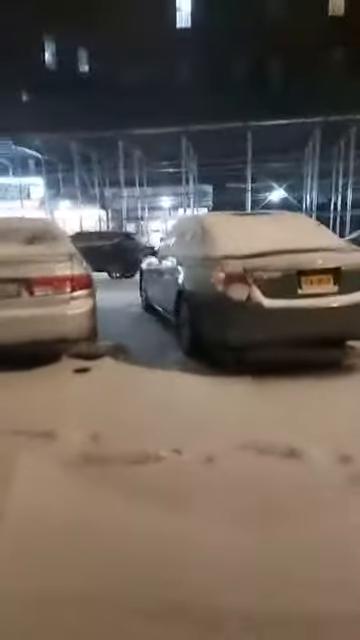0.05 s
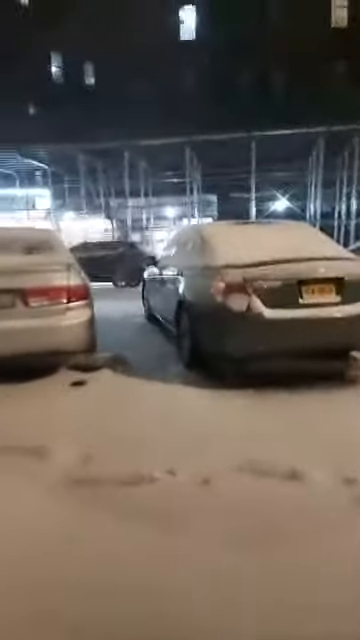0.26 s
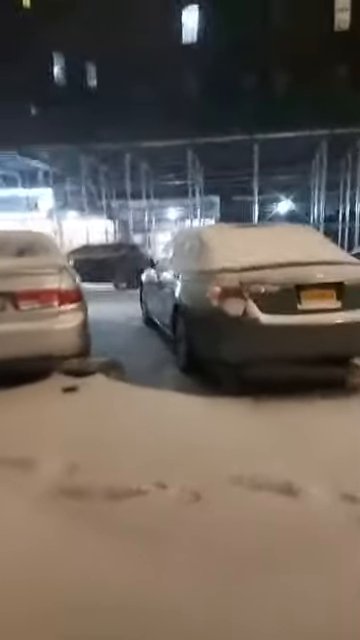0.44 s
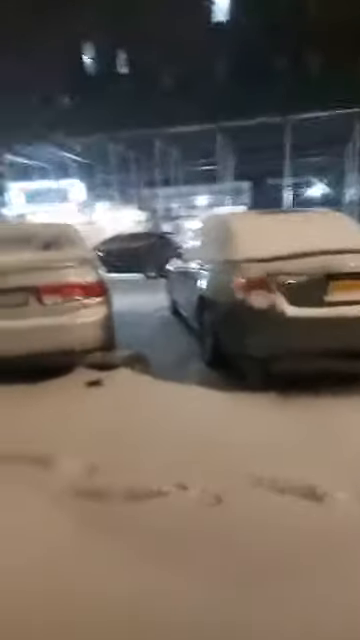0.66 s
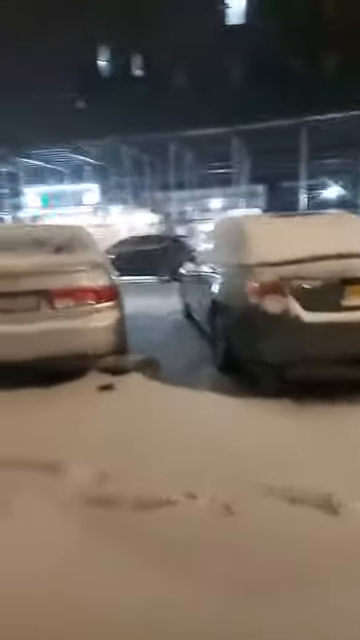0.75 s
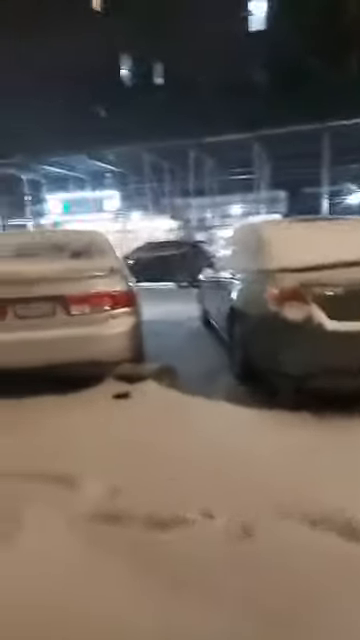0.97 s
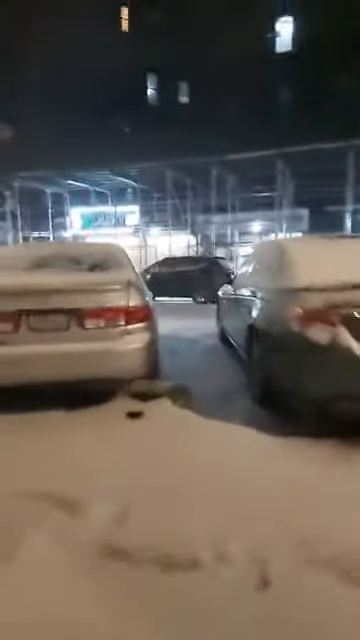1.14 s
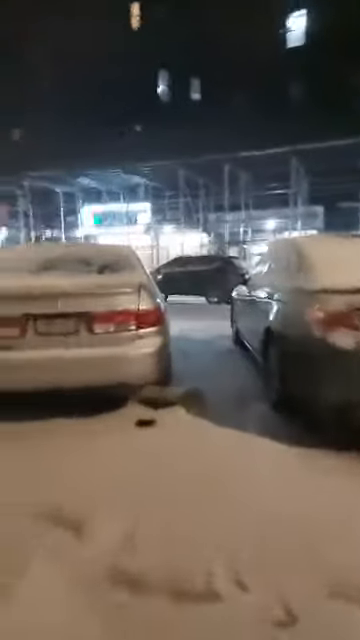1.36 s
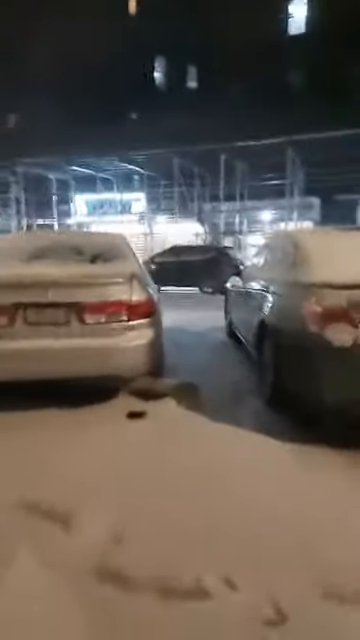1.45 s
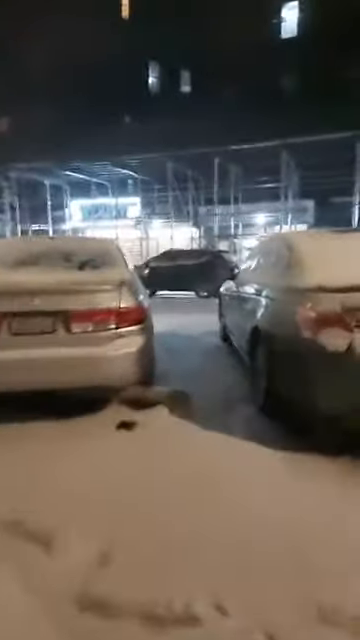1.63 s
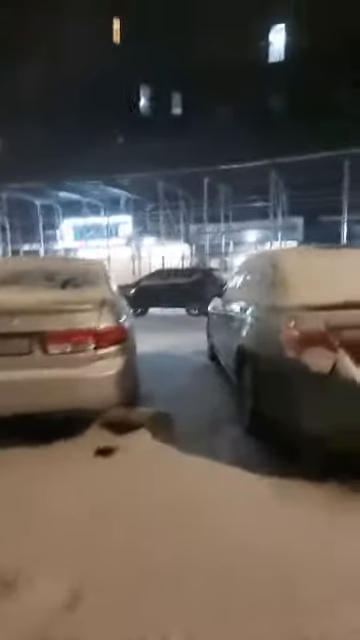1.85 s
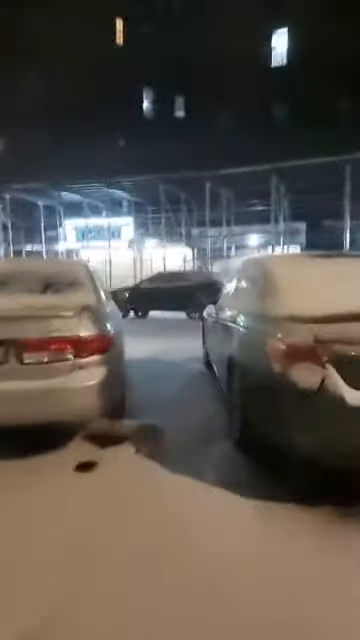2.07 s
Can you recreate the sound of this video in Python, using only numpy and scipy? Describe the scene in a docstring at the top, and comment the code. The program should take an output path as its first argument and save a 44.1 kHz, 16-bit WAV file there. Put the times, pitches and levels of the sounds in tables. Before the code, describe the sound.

Wind rumbles directly on a phone microphone from the start, low and uneven, with a thump near 0.4 seconds. It sinks to a lull around 0.6-0.75, exposing faint swishes and a thin squeak, then surges from 0.8, slapping hard near 1.1, 1.4, 1.55 and 1.8. Tiny icy ticks scatter throughout; a small snow crunch comes near 1.74. After 1.9 it drops away over faint town hum.

```python
"""Gusty wind buffets the microphone of a phone carried through a snowy parking lot at night.
The wind is banded noise: big eddies rumble with the gusts, small ones add a ragged flutter.
Single eddies slap the port as push-pull pulses.
Underneath: a faint town hum of shaped noise, swelling swishes of snow and clothing with thin squeaks,
and short resonant bursts for icy flakes ticking on the phone and crunches of packed snow."""
import sys
import numpy as np
from scipy import signal
from scipy.fft import rfft, irfft
from scipy.io import wavfile
from scipy.ndimage import uniform_filter1d

SR = 44100
rng = np.random.default_rng(int(sys.argv[2]) if len(sys.argv) > 2 else 0)


def digitize_waveform(pressure):
    """Quantize a signal to 16-bit integers and store it at the path in sys.argv[1].

    Rows of a 2-D input are taken as channels; values are limited to [-1, 1].
    """
    field = np.atleast_2d(pressure).T
    bounded = np.clip(field, -1, 1)
    quanta = np.round(bounded * 32767).astype(np.int16)
    wavfile.write(sys.argv[1], SR, quanta)


N = 92565

# Distant town, relative spectrum: frequency_hz, density_db (per Hz)
TOWN_COLOUR = [(40,7),(120,-4.5),(300,-11),(550,-15),(950,-6),(1500,-14.5),(2200,-21),(3200,-29.5),(5000,-32.5),(8000,-38),(15000,-47.5)]
# Soft swishes of snow and clothing: peak_s, rise_s, fall_s, level_db, tilt_db_per_octave
SWISHES = [(.25,0.1,0.075,-62.5,0.5),(.415,0.1,0.078,-56.5,0.5),(.56,0.047,0.038,-61.5,3.5),(.61,.04,0.053,-56,-2),(0.779,0.082,0.057,-72.5,3),(1.01,0.11,0.12,-60.5,-2.5),(1.189,0.094,.11,-59.5,-1),(1.411,0.13,0.16,-68.5,2.5),(1.65,0.097,0.045,-68,2),(1.83,0.14,0.12,-57.5,1),(1.95,0.1,0.14,-57.5,0.5),(2.09,0.023,.1,-55.5,1)]
# Relative spectrum of the swishes before their tilt: frequency_hz, density_db (per Hz)
SWISH_COLOUR = [(500,-10),(1500,9),(2600,-1),(4300,-1.5),(7000,-5.5),(9000,-10.5),(12000,-9.5),(15500,-9.5)]
# Thin squeaks of snow: peak_s, rise_s, fall_s, level_db
SQUEAKS = [(.615,0.053,.06,-68.5),(.79,.03,.04,-75.5)]
# Icy flakes on the phone: peak_s, level_db (energy spread over 5 ms), centre_hz
FLAKE_TICKS = [(.0995,-61.5,3810),(.150,-64,5000),(.233,-58.5,4200),(.289,-61.5,3600),(.570,-57,4770),(.992,-61.5,5500),(1.089,-63.5,5500),(1.1655,-54,4700),(1.436,-59.5,5240),(1.5072,-56,4200),(1.5578,-50.5,3900),(1.715,-60,4740)]
# Crunches of packed snow: peak_s, level_db (energy spread over 5 ms), centre_hz
SNOW_CRUNCHES = [(1.739,-42.5,1270),(1.783,-61.5,2700),(1.911,-55,1550)]
# Single eddies that slap the port: centre_s, peak_db (before BUFFET_TRIM_DB), pitch_hz
BUFFETS = [(.027,-18,407),(.061,-18,370),(.304,-23,420),(.380,-10.5,380),(0.4,-16,620),(.449,-21.5,420),(.839,-23,362),(1.007,-19.5,323),(1.102,-7.5,280),(1.125,-14,540),(1.286,-14,490),(1.346,-26,400),(1.425,-10,272),(1.478,-17,355),(1.544,-20,477),(1.563,-10.5,440),(1.659,-28.5,422),(1.677,-21.5,650),(1.815,-6,200)]
# Deep rumble of wind pressure at the port: time_s, level_db
RUMBLE_LEVEL = [(0.0, -22.5), (0.17, -22), (0.24, -24.1), (0.28, -15.5), (0.35, -24.5), (0.39, -17.5),
                (0.53, -25.5), (0.57, -31), (0.66, -34.5), (0.71, -42.2), (0.78, -34.5), (0.8, -25.5),
                (0.89, -21.5), (0.94, -26), (1.01, -19), (1.26, -19), (1.4, -21), (1.43, -19),
                (1.53, -20.5), (1.57, -16), (1.63, -27), (1.67, -15.5), (1.74, -31.5), (1.77, -14.5),
                (1.91, -27), (1.96, -42), (2.02, -29.4), (2.1, -29)]
# Low middle of the wind: time_s, level_db (before BODY_TRIM_DB)
BODY_LEVEL = [(0.0, -17), (0.07, -23), (0.09, -36), (0.18, -21), (0.22, -44), (0.25, -26.9), (0.38, -22),
              (0.44, -25.5), (0.5, -29.0), (0.63, -60), (0.74, -54.5), (0.84, -23), (0.89, -22),
              (0.94, -31), (1.11, -20.5), (1.2, -22), (1.24, -20.5), (1.34, -27.5), (1.36, -19),
              (1.4, -34.4), (1.47, -18), (1.51, -24.5), (1.57, -17.5), (1.6, -38), (1.68, -21.5),
              (1.71, -43), (1.81, -21), (1.98, -53), (2.02, -36), (2.1, -37.5)]
# Flutter from the small eddies of the hard gusts: time_s, level_db
FLUTTER_LEVEL = [(0.0, -42), (0.03, -34.5), (0.07, -30.5), (0.09, -41), (0.15, -43), (0.17, -38.7),
                 (0.22, -57.5), (0.31, -36.5), (0.34, -39), (0.38, -28.7), (0.56, -53), (0.77, -57),
                 (0.82, -45.5), (0.84, -38), (0.89, -36), (0.91, -44.5), (1.01, -35), (1.08, -41),
                 (1.1, -28.6), (1.14, -27.5), (1.2, -34.5), (1.29, -32), (1.3, -37), (1.36, -33.5),
                 (1.4, -63), (1.42, -32.5), (1.46, -42.5), (1.47, -39), (1.5, -41.4), (1.58, -26.5),
                 (1.6, -63), (1.68, -34), (1.76, -50), (1.81, -37), (1.83, -38.5), (1.96, -58),
                 (2.05, -43.5), (2.1, -46.5)]
# Relative spectrum of the wind before the gusts shape it: frequency_hz, density_db (per Hz)
WIND_COLOUR = [(15,-49),(25,-23.5),(38,-10),(52,-4.5),(72,0.5),(100,-1),(130,0),(165,-3),(210,-7.5),(310,-5.5),(420,-12.5),(600,-21),(800,-27),(1100,-36.5),(1600,-49),(2500,-62.5),(5000,-88)]
# Microphone response: frequency_hz, gain_db
MIC_RESPONSE = [(7500,0.5),(9000,-0.5),(10000,-7.5),(11500,1),(15000,2)]

TOWN_DB, TOWN_WAVER_DB = -49, -0.43
SWISH_GRAIN_DB, SWISH_GRAINS_PER_S = 2.5, 480
SQUEAK_HZ, SQUEAK_WIDTH_OCT = 4140, 0.04
SNAP_LEVEL_S = 0.005  # span over which the level of a tick or crunch is counted
BUFFET_TRIM_DB, BODY_TRIM_DB = -5, 1
BIG_EDDY_HZ, MIDDLE_EDDY_HZ, SMALL_EDDY_HZ = 130, 260, 545
RAGGED_PER_S, RAGGED_BIG_DB, RAGGED_SMALL_DB = 95, 1.5, 3
TOP_SWING = 0.27  # extra dB swing per dB of flutter, per octave above the small eddies
LOW_CUT_HZ, TOP_HZ, FADE_S = 27, 15750, 0.004


def undb(db):
    """Decibels to gain."""
    return 10 ** (np.asarray(db) / 20)


def unit(x):
    """Scale to rms 1."""
    return x / np.sqrt(np.mean(x ** 2))


def times():
    """Time of every sample in seconds."""
    return np.arange(N) / SR


def freqs():
    """Frequency of every spectral bin in Hz, kept at 1 or above so logarithms work."""
    return np.maximum(np.arange(N // 2 + 1) * SR / N, 1)


def curve(rows):
    """Join (time, value) rows by straight lines."""
    return np.interp(times(), *np.array(rows).T)


def colour(points):
    """Gain per bin from (Hz, dB) points, joined along log frequency."""
    hz, db = np.array(points).T
    return undb(np.interp(np.log(freqs()), np.log(hz), db))


def bell(hz, octaves):
    """Gain per bin of one smooth resonance."""
    distance = np.log2(freqs() / hz) / octaves
    return np.exp(-0.5 * distance ** 2)


def noise(gain):
    """Noise of rms 1 with the given gain per bin."""
    spectrum = rfft(rng.standard_normal(N)) * gain
    return unit(irfft(spectrum, N))


def walk(rate):
    """Smooth random wander of spread 1 that changes about rate times a second."""
    return noise(np.exp(-2 * (freqs() / rate) ** 2))


def swells(rows):
    """Envelope of soft swells, each with its own rise and fall; overlaps add in power."""
    t = times()
    power = 0
    for peak_s, rise_s, fall_s, level_db in rows:
        distance = (t - peak_s) / np.where(t < peak_s, rise_s, fall_s)
        power = power + (undb(level_db) * np.exp(-distance ** 2)) ** 2
    return np.sqrt(power)


def steady(x, size):
    """Even out the slow random swings of a noise, leaving its level to the gusts."""
    power = uniform_filter1d(x ** 2, size, mode="wrap")
    power = uniform_filter1d(power, size, mode="wrap")
    return x * np.sqrt(np.mean(x ** 2) / (power + 1e-20))


def town():
    """Distant streets: noise shaped to a dull hum whose level wavers a little."""
    return noise(colour(TOWN_COLOUR)) * undb(TOWN_DB + TOWN_WAVER_DB * walk(6))


def walking():
    """Snow and clothing rub as grainy noise, dull or bright; narrow resonances squeak thinly."""
    grain = undb(SWISH_GRAIN_DB * walk(SWISH_GRAINS_PER_S))
    squeaks = noise(bell(SQUEAK_HZ, SQUEAK_WIDTH_OCT)) * swells(SQUEAKS)
    out = squeaks
    for peak_s, rise_s, fall_s, level_db, tilt_db in SWISHES:
        tilt = undb(tilt_db * np.log2(freqs()))
        swish = unit(noise(colour(SWISH_COLOUR) * tilt) * grain)
        out = out + swish * swells([(peak_s, rise_s, fall_s, level_db)])
    return out


def snaps(rows, decay_s, octaves, splash_db):
    """Tiny impacts: a burst that dies at once, in a broad resonance with a little treble splash."""
    out = 0
    for peak_s, level_db, centre_hz in rows:
        age = times() - peak_s
        splash = undb(splash_db) * (freqs() > centre_hz)
        burst = noise(bell(centre_hz, octaves) + splash)
        # The onset is twice as fast as the decay
        burst = burst * np.exp(-np.where(age < 0, -2 * age, age) / decay_s)
        level = np.sqrt(np.sum(burst ** 2) / (SNAP_LEVEL_S * SR))
        out = out + undb(level_db) * burst / level
    return out


def flake_ticks():
    """Icy flakes hit the phone: very short bright bursts with treble splash."""
    return snaps(FLAKE_TICKS, decay_s=0.0026, octaves=0.53, splash_db=-14.5)


def snow_crunches():
    """Packed snow crunches: slightly longer bursts with little splash."""
    return snaps(SNOW_CRUNCHES, decay_s=0.004, octaves=0.57, splash_db=-34)


def buffets():
    """An eddy crossing the port: one push and one pull, quicker for a smaller eddy."""
    out = 0
    for centre_s, peak_db, pitch_hz in BUFFETS:
        turn = 2 * np.pi * pitch_hz * (times() - centre_s)
        push_pull = -turn * np.exp((1 - turn ** 2) / 2)
        out = out + undb(peak_db + BUFFET_TRIM_DB) * push_pull
    return out


def wind():
    """Eddies in bands: big ones follow the gust, small ones flare in its peaks in ragged bursts."""
    flutter = curve(FLUTTER_LEVEL)
    ragged = walk(RAGGED_PER_S)
    shape, f = colour(WIND_COLOUR), freqs()
    eddies = rfft(noise(shape))

    def share_db(low_hz, high_hz):
        """Part of the wind's power that its colour puts between two frequencies."""
        inside = (f > low_hz) & (f < high_hz)
        return 10 * np.log10(np.sum(shape[inside] ** 2) / np.sum(shape ** 2))

    # Gain that brings each range of the noise to its tabled level
    big = curve(RUMBLE_LEVEL) - share_db(30, 190)
    middle = curve(BODY_LEVEL) - share_db(200, 420) + BODY_TRIM_DB
    small = flutter - share_db(450, 1200)
    levels = np.array([big, middle, small])
    sizes = np.log([BIG_EDDY_HZ, MIDDLE_EDDY_HZ, SMALL_EDDY_HZ])

    out = 0
    for hz in 22 * 2.0 ** (np.arange(13) / 1.5):  # bands two thirds of an octave apart
        # Triangular bands overlap so that neighbours add up to one
        triangle = np.maximum(1 - 1.5 * abs(np.log2(f / hz)), 0)
        band = irfft(eddies * triangle, N)
        band = steady(band, size=int(SR * max(3 / hz, 0.022)))
        # Bands between the three eddy sizes blend the levels of their neighbours
        weights = np.array([np.interp(np.log(hz), sizes, row) for row in np.eye(3)])
        octaves_above = max(np.log2(hz / SMALL_EDDY_HZ), 0)
        gust_db = weights @ levels + TOP_SWING * octaves_above * (flutter - flutter.max())
        ragged_db = RAGGED_BIG_DB + weights[-1] * (RAGGED_SMALL_DB - RAGGED_BIG_DB)
        burst = unit(undb(ragged * ragged_db))
        out = out + band * burst * undb(gust_db)
    return out


def scene():
    """Wind on the port over the quiet lot, as one channel."""
    impacts = flake_ticks() + snow_crunches()
    return (impacts + wind() + buffets() + town() + walking())[None]


def record(dry):
    """The microphone sheds the deepest bass and dips in the high treble; the recorder cuts the top."""
    t = times()
    from_end = np.minimum(t, t[-1] - t)
    edges = np.sin(np.pi / 2 * np.clip(from_end / FADE_S, 0, 1)) ** 2
    low_cut = 1 / np.sqrt(1 + (LOW_CUT_HZ / freqs()) ** 12)
    coloured = irfft(rfft(dry * edges) * colour(MIC_RESPONSE) * low_cut, N) * edges
    top_cut = signal.ellip(10, 0.2, 80, TOP_HZ, fs=SR, output="sos")  # ripple 0.2 dB, stop 80 dB
    return signal.sosfilt(top_cut, coloured)


dry = scene()
out = record(dry)
digitize_waveform(out)
```